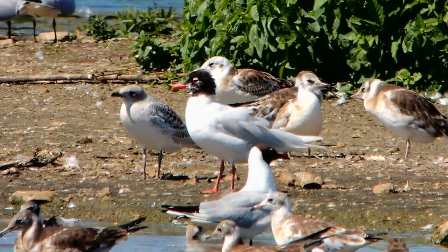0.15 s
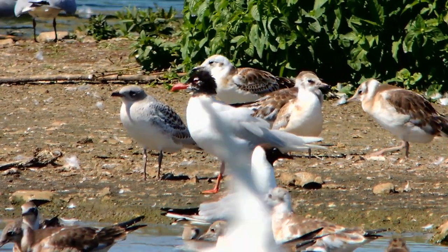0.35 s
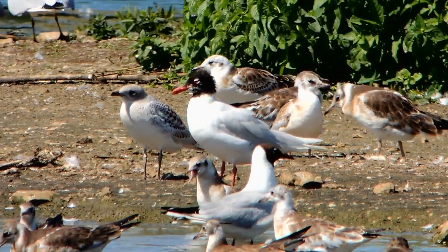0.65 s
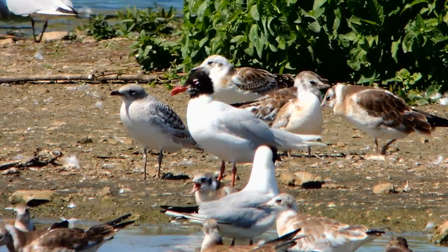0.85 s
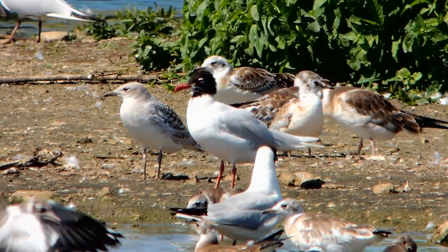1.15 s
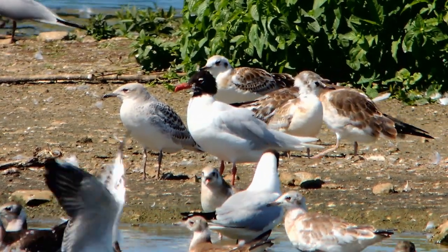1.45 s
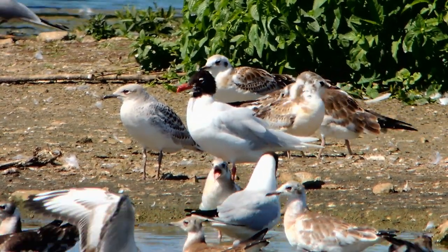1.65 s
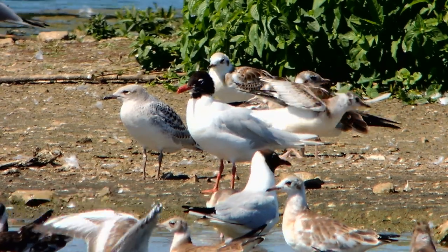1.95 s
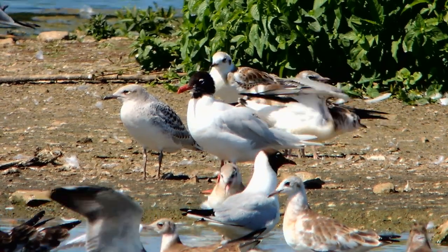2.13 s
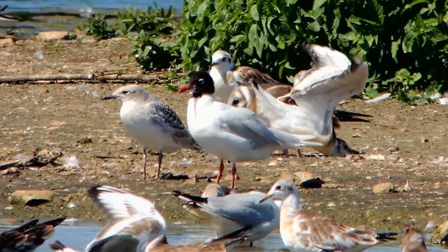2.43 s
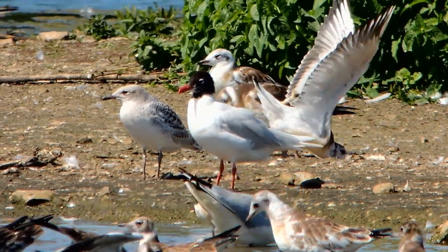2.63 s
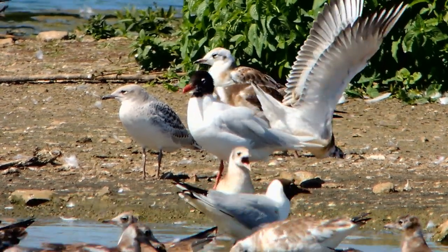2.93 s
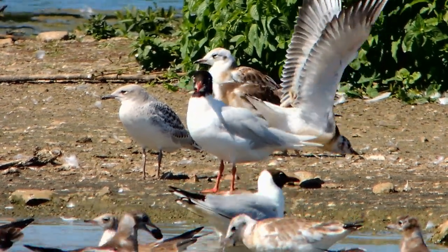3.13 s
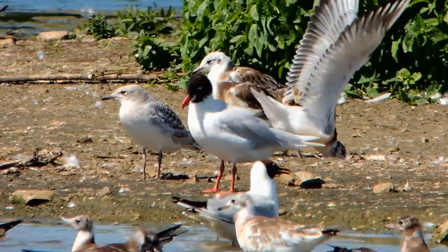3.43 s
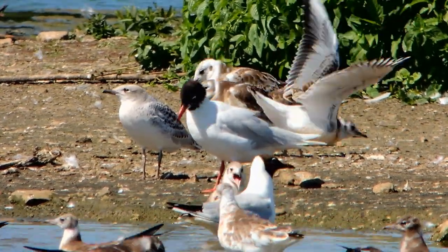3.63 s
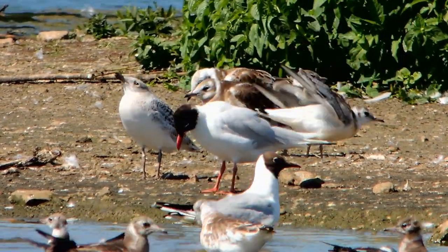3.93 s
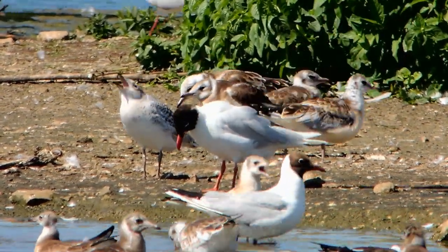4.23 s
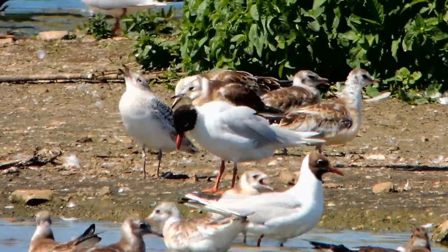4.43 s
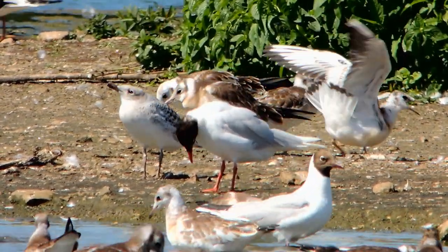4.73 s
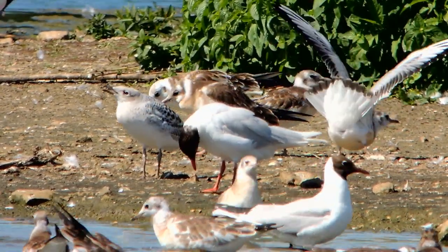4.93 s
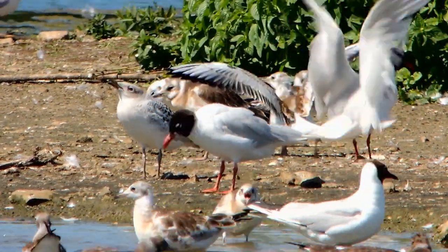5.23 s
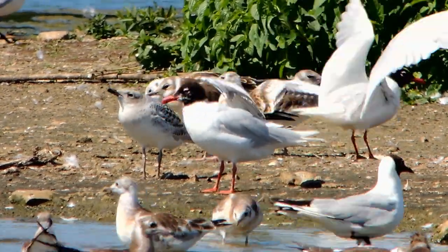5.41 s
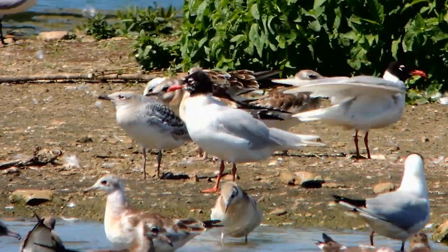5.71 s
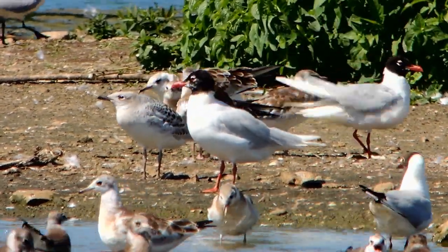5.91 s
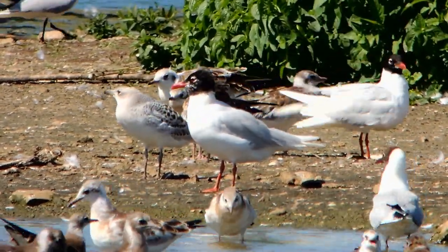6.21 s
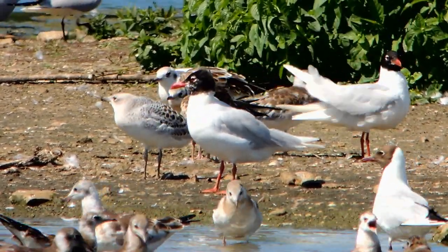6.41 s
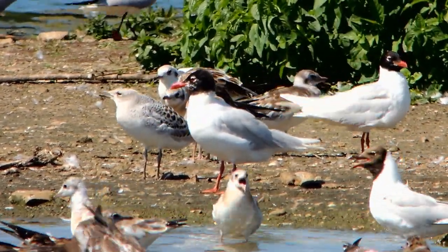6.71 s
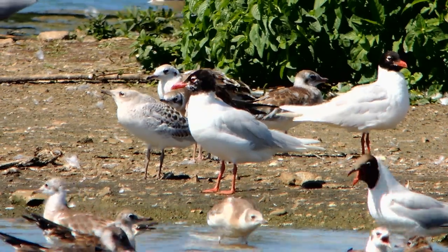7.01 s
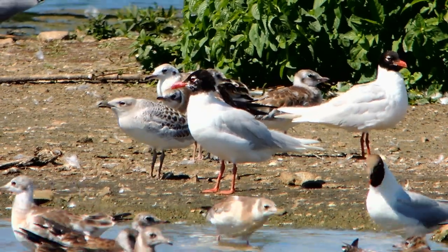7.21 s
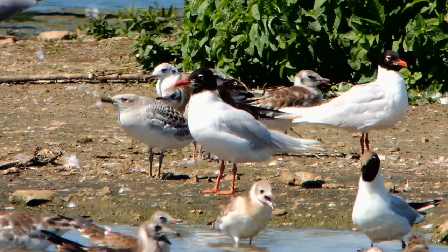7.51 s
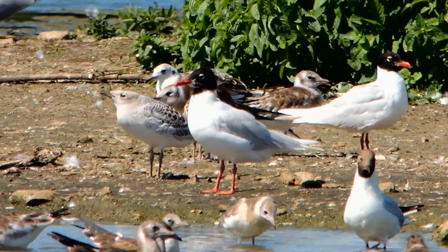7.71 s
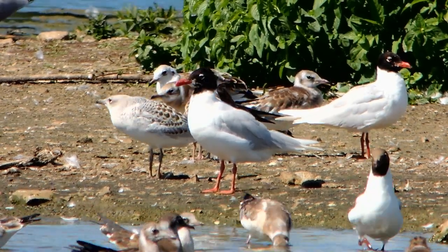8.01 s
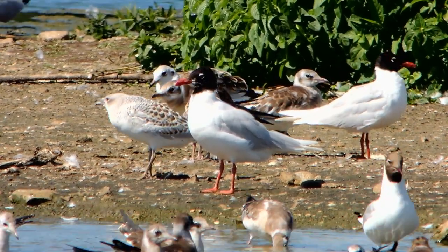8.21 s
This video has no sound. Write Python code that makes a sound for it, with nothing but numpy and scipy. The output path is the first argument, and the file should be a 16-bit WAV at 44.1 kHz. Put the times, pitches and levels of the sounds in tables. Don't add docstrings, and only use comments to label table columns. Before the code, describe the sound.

Outdoors at a gull colony by water, a far crowd of birds calls without pause over faint water noise and low road rumble. From 0 to 1 s several hoarse, distant adults give short rattling cries near 1 kHz, with thin chick whistles above. At 1.2-1.5 s the nearest chick lets out a piercing run of rapid squeaks, its voice cracking and scraping. Long adult cries overlap around 1.8-2.2 s. The chick strains again, more softly, at 2.4-2.6 s and 3.7-4.0 s. Between 2.9 and 4.8 s adults are nearer and rougher, with a bright rattling cry at 3.3 s and a buzzing one at 4.7 s. From 5 to 7 s chick whistles and squeals crowd together among clipped adult calls. A sharp cluster of camera-body ticks snaps at 7.0 s, with tiny ones after. A high cry follows at 7.3 s, then yelps and rasps until 8.4 s.

```python
import sys
import numpy as np
from scipy import signal
from scipy.fft import rfft, irfft, next_fast_len
from scipy.io import wavfile
from scipy.ndimage import uniform_filter1d, map_coordinates

SR = 44100
rng = np.random.default_rng(int(sys.argv[2]) if len(sys.argv) > 2 else 0)


def wav_out(sig):
    wavfile.write(sys.argv[1], SR, np.round(np.clip(np.atleast_2d(sig).T, -1, 1) * 32767).astype(np.int16))


def volts_from_decibels(level):
    exponent = np.asarray(level, float) / 20
    return 10 ** exponent


N = 368215

# (centre [Hz], width [Hz], gain [dB])
THROAT_HZ_DB = [(930, 550, -14.5), (1500, 820, -25), (1980, 480, 1.5)]
# (centre [Hz], width [Hz], gain [dB])
BEAK_HZ_DB = [(4300, 1070, 1), (5430, 920, -7), (6410, 290, -11.5)]
# (centre [Hz], width [Hz], gain [dB])
SHRILL_HZ_DB = [(7740, 2700, -2)]
# (centre [Hz], width [Hz], gain [dB])
GAPE_HZ_DB = [(2980, 1280, 1.5)]
# (multiple of loud harmonic [ratio], level above fourth-harmonic setting [dB])
OVERTONES = [(4 / 3, 0), (2, -11.5), (7 / 3, -18), (2.2, -22)]
# (time [s], far birds [dB], rumble [dB])
DISTANCE_DB = [(0.0, -45, -54), (0.04, -44, -47), (0.74, -39.5, -51.5), (1.84, -44, -54.5),
               (1.93, -40, -61), (2.04, -40.5, -50.5), (2.28, -45.5, -57), (3.25, -42.5, -55.5),
               (4.35, -45, -51), (4.65, -38, -47.5), (5.05, -46.5, -49.5), (5.7, -44.5, -50.5),
               (6.49, -48.5, -50), (7.49, -40, -49), (7.84, -47, -49), (8.35, -39.5, -50)]
# (frequency [Hz], density [dB])
BED_SPECTRUM = [(88, 1), (150, -3.5), (402, -7), (685, -3.5), (876, 1.5), (1330, -5), (1980, -0.5),
                (2490, -10.5), (3440, -13), (4320, -9), (6940, -27), (11800, -26.5), (14000, -31.5)]
# (frequency [Hz], density [dB])
BED_SIDE_SPECTRUM = [(88, -34), (150, -5), (1020, -5), (1840, -8), (2140, -11.5), (3310, -9.5),
                     (4320, -5.5), (14000, -15.5)]
# (frequency [Hz], density [dB])
RUMBLE_SPECTRUM = [(12, -32), (20, -1.5), (65, 2.5), (200, -23), (260, -61), (440, -120)]
# (time [s], snap level [dB], knock level [dB])
TICKS = [(6.9887, -14, -20), (6.990, -28, -37), (6.9915, -28, -50), (6.994, -18, -50), (6.997, -30, -50),
         (5.77, -41, -65), (6.225, -47, -60), (7.319, -33, -60), (7.19, -36, -70), (7.23, -37, -70),
         (7.85, -42, -70)]
# (centre [Hz], width [Hz], gain [dB])
SHELL_HZ_DB = [(7500, 4200, -8.5), (11200, 4500, -5)]
# (frequency [Hz], t60 [s])
SHORE_T60_S = [(500, 0.69), (2000, 0.18), (8000, 0.16)]
# (start [s], end [s], level [dB])
SCRAPES = [
    (1.37, 1.408, -65),
    (1.454, 1.498, -67),
    (2.543, 2.58, -59),
    (3.845, 3.89, -67),
    (3.91, 3.988, -64),
]
VOICES = {"far hoarse": (1030, .12, .14, 58, .46, -30, -9), "far husky": (1045, .06, .1, 66, .44, -24, -16),
          "far open": (970, .06, .06, 64, .55, -12, -3), "far low": (900, .04, .08, 61, .5, -28, -10),
          "far rising": (1180, .2, 0, 70, .55, -28, -8), "long caller": (1090, .07, .1, 57, .42, -12, -14),
          "buzzing": (1090, .1, .07, 120, .33, -2, -6), "high": (1290, .2, .24, 78, .36, -18, -24),
          "slow rattle": (1100, .16, .2, 49.5, .36, -24, -24),
          "wide rattle": (1325, .04, .04, 49.5, .22, -14, -8),
          "near rattle": (1150, .24, .1, 64.3, .42, -36, -4),
          "shrill rattle": (1330, .06, .03, 53.5, .24, -3, -17),
          "arching": (1090, .16, .12, 56, .42, -20, -14), "bright": (1125, .12, .13, 58, .36, -24, -10),
          "rasping": (1045, .05, .05, 80, .58, -11, -16), "thin rattle": (1010, .05, .05, 55, .24, -24, -4),
          "clear": (995, .05, .05, 58, .4, -20, -8), "yelping": (1195, .02, .25, 90, .33, -20, 0)}
FAR_CRIES = {"far hoarse": [(.385, 0.28, -41.5, -52.5, -2), (5.3, 0.13, -45.5, -53, 0)],
             "far husky": [(5.59, .24, -42, -53, -6), (6.86, 0.21, -47, -60, 8),
             (7.18, .28, -44.5, -53, 9)], "far open": [(5.88, 0.28, -45.5, -52.5, 0),
             (6.86, 0.21, -55, -48, 2)], "far low": [(0, .28, -43, -53, -9), (.46, 0.2, -48, -54, 0),
             (.685, .12, -42.5, -55, -1), (.9, .2, -45.5, -60, -2), (1.92, 0.33, -45.5, -62, 4),
             (5.56, .15, -50, -62, 0), (7.46, .26, -51, -61, -2), (8.25, 0.12, -48, -50.5, -4)],
             "far rising": [(.1, .19, -46, -52, 2), (7.75, .15, -47, -64, -11)]}
NEAR_CRIES = {"long caller": [(1.79, .3, -42.5, -61, -2), (1.91, .33, -43.5, -44.5, -2.5)],
              "buzzing": [(4.69, .19, -38, -52, -4)], "bright": [(2.61, .21, -39.5, -51, -1),
              (.77, .3, -43.5, -54, 5)], "high": [(7.26, .47, -60, -43.5, -4),
              (6.565, .26, -60, -49.5, -4)], "clear": [(6.2, 0.145, -44, -64, -5),
              (6.63, .14, -42.5, -52, -3), (5.43, .13, -43, -58, -5), (1.52, 0.177, -43, -57, -1)],
              "yelping": [(7.972, .14, -42, -47.5, -1)], "slow rattle": [(3.1, .25, -41, -43.5, -7)],
              "wide rattle": [(3.12, 0.19, -48.5, -44.5, -2), (3.795, .2, -45.5, -58, -4),
              (4.61, 0.242, -47, -51, -7), (5.37, .1, -54, -55, 0)],
              "near rattle": [(3.34, .215, -46.5, -37, 2)], "shrill rattle": [(4.446, 0.202, -62, -47, 2)],
              "arching": [(4.45, .24, -41.5, -51, -3), (1.58, .13, -52, -50.5, 4)],
              "rasping": [(3.66, .38, -41.5, -48.5, -3.5), (8.08, .2, -51, -47.5, 2)],
              "thin rattle": [(2.935, .175, -65, -45.5, -2), (8.245, .12, -65, -53, 0)]}
# (start [s], length [s], from [Hz], to [Hz], level [dB])
RISES = [(0.254, .125, 4393, 4400, -58.5), (1.172, .09, 3600, 3900, -58), (1.822, .03, 4080, 4900, -53),
         (1.78, .1, 6880, 7000, -70), (1.72, .115, 4450, 4680, -58), (6.49, 0.036, 3650, 4280, -55.5),
         (2.36, .05, 3200, 3920, -60), (2.42, .08, 5400, 6400, -65), (2.76, .19, 3100, 4050, -62),
         (1.785, .11, 3380, 3420, -61), (6.4, .1, 4100, 4400, -62), (3.604, 0.11, 4520, 4673, -61),
         (6.82, .06, 4500, 4600, -61), (6.885, .06, 4500, 4750, -58), (4.4, .09, 4600, 4650, -61),
         (4.79, .15, 3800, 4300, -58), (4.94, 0.027, 2570, 2649, -54), (5.13, .085, 4600, 4720, -55),
         (5.35, .05, 3600, 3760, -60), (5.462, 0.11, 3680, 4400, -56), (5.681, .07, 3950, 4350, -58),
         (5.777, 0.12, 4600, 4680, -53), (5.89, .05, 4640, 4680, -56), (6.23, 0.12, 3350, 3550, -63),
         (6.3, 0.099, 4200, 5060, -56.5), (6.514, 0.028, 3600, 3900, -52), (6.495, .022, 2950, 3100, -58),
         (6.5, .13, 4490, 4590, -56), (7.298, .06, 3650, 4270, -54), (7.505, .025, 3170, 3450, -53),
         (7.94, .16, 4480, 4640, -55)]
# (start [s], length [s], from [Hz], to [Hz], level [dB])
FALLS = [(1.04, 0.19, 4510, 4310, -58.5), (1.459, 0.029, 2990, 2730, -43.5), (1.85, .014, 4880, 4600, -53),
         (1.86, 0.16, 4580, 4450, -52), (2.3, .14, 4511, 4420, -61), (4.24, 0.027, 3047, 3036, -53.5),
         (5.215, 0.12, 5082, 4610, -58), (5.3, 0.094, 4770, 4690, -57.5), (5.6, .1, 4150, 3680, -63),
         (3.955, .03, 3800, 3450, -52), (5.82, 0.18, 4170, 3450, -62), (5.94, .1, 4960, 4500, -56.5),
         (6.24, .1, 2900, 2850, -61), (2.85, .09, 4400, 3800, -62), (2.28, .08, 4000, 3680, -62),
         (5.3, .11, 4700, 4380, -63), (7.72, .1, 3480, 3400, -61), (5.22, .1, 3250, 3050, -62),
         (6.44, 0.065, 4694, 4500, -57), (6.505, .065, 2400, 2200, -58), (6.565, 0.07, 3980, 3600, -53),
         (6.63, .08, 3620, 3500, -56), (6.72, .08, 3500, 3300, -62), (4.28, .03, 2550, 2500, -56),
         (4.22, .05, 4000, 3950, -60), (7.04, .06, 4400, 3950, -64), (6.65, .1, 4600, 4460, -60),
         (7.55, .03, 5000, 4800, -54)]
# (start [s], length [s], from [Hz], arch height [Hz], level [dB])
ARCHES = [(.271, 0.16, 4102, 200, -54), (2.495, .135, 4790, 160, -61), (6.1, .2, 4050, 200, -62),
          (5.64, .15, 3250, 120, -64), (1.04, .06, 3200, 200, -60), (2.62, 0.12, 4440, 94, -57),
          (2.762, 0.21, 4450, 114.5, -52), (5.08, .055, 4700, 185, -57), (5.748, .035, 4740, 140, -56),
          (6.33, 0.19, 3900, 319, -58), (6.862, 0.022, 3900, 250, -55), (8.3, .32, 3700, 260, -62),
          (5.56, .07, 4150, 149, -60), (7.41, .04, 3850, -120, -59), (7.69, .04, 3950, -150, -57),
          (6.525, .075, 7500, 800, -72)]
# (start [s], length [s], from [Hz], to [Hz], level [dB])
SQUEALS = [(.44, .3, 3950, 3750, -56), (.38, 0.22, 4800, 5050, -58), (.75, .3, 4400, 4600, -60),
           (1.94, 0.35, 4400, 4250, -53.5), (4.5, 0.196, 4300, 4750, -65), (6.385, 0.064, 5100, 4600, -57),
           (8.07, .2, 4720, 4150, -51.5), (8.11, 0.15, 4100, 4050, -58), (6.2, 0.13, 4600, 3800, -61),
           (7.12, 0.183, 4050, 4200, -57.5), (7.15, 0.127, 4450, 4600, -59.5),
           (7.99, 0.14, 4300, 4750, -59), (5.6, .16, 4750, 4700, -57.5), (5.36, .09, 4100, 4100, -59),
           (2.43, .11, 3500, 3350, -64), (2.54, .13, 3050, 2900, -59), (6.74, .13, 3200, 3650, -59.5),
           (2.68, .15, 4900, 5000, -62), (7.52, .21, 4800, 3950, -59), (7.32, 0.2, 4650, 4850, -56),
           (3.97, .12, 4000, 4250, -57), (3.55, 0.122, 4300, 4450, -59), (6.9, 0.16, 4100, 4700, -61),
           (5.23, .07, 3600, 3520, -55), (2.93, 0.171, 3050, 3200, -58.5), (5.95, .2, 5300, 4100, -65)]
# (start [s], length [s], third harmonic from [Hz], to [Hz], level [dB])
STRAINED = [
    (1.204, 0.056, 4250, 4220, -40),
    (2.463, .048, 4220, 4260, -48),
    (1.443, .021, 4330, 3860, -39),
]
# (start [s], length [s], third harmonic from [Hz], to [Hz], level [dB])
BROKEN = [
    (1.378, 0.0153, 4200, 3900, -37),
    (1.393, 0.0095, 3860, 4100, -36),
    (1.463, .005, 4100, 3950, -41),
    (1.468, 0.0091, 4000, 4200, -39),
    (1.475, 0.018, 3880, 3790, -44.5),
    (2.534, 0.0175, 4240, 3820, -46),
    (2.553, .03, 4150, 4270, -49),
    (3.85, 0.027, 4020, 3880, -42),
    (3.908, 0.053, 4010, 3690, -42),
]
# (start [s], length [s], third harmonic from [Hz], to [Hz], level [dB])
CLEAR = [
    (1.259, 0.028, 4320, 4500, -42.5),
    (1.283, 0.03, 4460, 3820, -31),
    (1.313, 0.032, 4120, 4200, -36.5),
    (1.348, 0.034, 4380, 3930, -39),
    (1.415, 0.03, 4150, 4290, -43.5),
    (2.424, 0.045, 4200, 4440, -52),
    (2.59, .038, 4000, 3860, -47.5),
    (3.714, 0.046, 4230, 4350, -47),
    (3.82, 0.031, 4300, 4130, -45),
]
# (start [s], length [s], third harmonic from [Hz], to [Hz], level [dB])
SCOOPED = [
    (3.666, 0.05, 4210, 4180, -46.5),
    (3.763, 0.048, 4250, 4280, -42.5),
]
# (slur ease [exponent], bow [Hz], pitch waver [share],
# level waver [dB], fourth harmonic [dB])
NOTE_KINDS = [(0.98, -150, 0.009, 1, -12), (0.75, -1, 0.0197, 3.5, -11.5), (0.576, 60, 0.011, 0, -22),
              (1, -190, .008, 1.5, -16)]

BED_DB, SIDE_DB = -46, -59.5
BAND_LIMIT_HZ = 14200
CRY_DROOP_DB, WHISTLE_DROOP_DB = 1.5, 1
RISE_EASE, FALL_EASE, ARCH_SAG_HZ = 1.4, 1.4, 102.6
PUSH_DB_PER_KHZ = 19
SQUEAL_WAVER, THROAT_FOLLOWS = 0.038, 0.85
BURST_LEAN, BURST_ARCH = 1.35, 0.035


def unit(x):
    return x / np.sqrt(np.mean(x ** 2) + 1e-20)


def along(points, hz):
    f, v = np.transpose(points)
    return np.interp(np.log(hz + 1), np.log(f + 1), v)


def humps(modes, hz):
    return sum(volts_from_decibels(db) / (1 + ((hz * hz - c * c) / (hz * w + 1)) ** 2) for c, w, db in modes)


def wobble(rate, n):
    return map_coordinates(rng.standard_normal(int(n * rate / SR) + 4), [np.arange(n) * rate / SR])


def span(rows, fade):
    s, *cols = np.transpose(rows)
    t = np.arange(s[0], s[-1], 1 / SR)
    edge = np.clip(np.minimum(t - s[0], s[-1] - t) / fade, 0, 1)
    return round(s[0] * SR), np.sin(edge * np.pi / 2) ** 2, [np.interp(t, s, c) for c in cols]


def slur(s, length, from_hz, to_hz, ease, bow_hz, fade):
    start, edge, (u,) = span([(s, 0), (s + length, 1)], fade)
    glide_hz = (to_hz - from_hz) * (1 - (1 - u) ** ease)
    return start, edge, u, from_hz + glide_hz + bow_hz * np.sin(np.pi * u)


def add(track, start, sound):
    track[start:start + len(sound)] += sound[:N - start]


def filtered(x, response):
    m = next_fast_len(N + 8192)
    return irfft(rfft(x, m) * response(np.fft.rfftfreq(m, 1 / SR)), m)[..., :N]


def noise(spectrum):
    return unit(filtered(rng.standard_normal(N), lambda hz: volts_from_decibels(along(spectrum, hz))))


def background():
    s, _, rumble_db = np.transpose(DISTANCE_DB)
    rumble = volts_from_decibels(np.interp(np.arange(N) / SR, s, rumble_db))
    mid = volts_from_decibels(BED_DB) * noise(BED_SPECTRUM) + rumble * noise(RUMBLE_SPECTRUM)
    side = volts_from_decibels(SIDE_DB + 0.0) * noise(BED_SIDE_SPECTRUM) + rumble * noise(RUMBLE_SPECTRUM) / 2.8
    return np.array([mid + side, mid - side])


def shore(x):
    hz, t, z = signal.stft(rng.standard_normal((2, SR // 2)), SR, nperseg=256)
    decay = volts_from_decibels(-60 * t / along(SHORE_T60_S, hz)[:, None])
    tail = signal.istft(z * decay, SR, nperseg=256)[1]
    tail = tail[0] + 0.33 * tail[1] * np.array([[1], [-1]])
    return signal.fftconvolve(x[None], tail / np.linalg.norm(tail[0]), axes=1)[:, :N]


def ticks():
    snap, knock, t = np.zeros((2, N)), np.zeros(N), np.arange(SR // 20) / SR
    for s, snap_db, knock_db in TICKS:
        shared, own = rng.standard_normal((2, len(t)))
        decay = volts_from_decibels(snap_db - 1.5 - 60 * t / 0.012) + volts_from_decibels(snap_db - 14.0 - 60 * t / 0.12)
        snap[:, round(s * SR):][:, :len(t)] += decay * [shared, 1.08 * own - 0.3 * shared]
        add(knock, round(s * SR), volts_from_decibels(knock_db - 60 * t / 0.0059) * np.sin(2 * np.pi * 1700 * t))
    return knock + filtered(snap, lambda hz: humps(SHELL_HZ_DB, hz))


def crowd(count=100):
    out = np.zeros(N)
    for i, (when, long, pitch, size, kind) in enumerate(rng.random((count, 5))):
        s, db = (i + when) / count * N / SR, 6 * size
        shape = [(s, .94, db - 16), (s + .08, 1.02, db), (s + .18 + .25 * long, .93, db + 1.0)]
        start, edge, (glide, level_db) = span(shape, fade=0.081)
        voice = (830 + 330 * pitch, .1, .1, 50 + 40 * kind, .5, -14.5, -1.7)
        add(out, start, edge * squawk(*voice, level_db, level_db - 10.5))
        chick_hz = (3200 + 1300 * kind) * glide ** 2
        add(out, max(start - 9000, 0), edge * whistle(chick_hz, level_db - 24))
    return unit(out)


def whistle(hz, db, hoarse=0):
    n = len(hz)
    phase = 2 * np.pi * np.cumsum(hz * (1 + 0.0023 * wobble(102.0, n) + hoarse * wobble(700, n))) / SR
    return volts_from_decibels(db + 6.5 + 1.7 * wobble(62.4, n)) * (np.sin(phase) + volts_from_decibels(-30.5) * np.sin(2 * phase))


def chicks():
    out = np.zeros(N)
    notes = [(*note, RISE_EASE, 0) for note in RISES] + [(*note, FALL_EASE, 0) for note in FALLS]
    notes += [(s, length, hz, hz - ARCH_SAG_HZ, db, 1, bow_hz) for s, length, hz, bow_hz, db in ARCHES]
    for s, length, from_hz, to_hz, db, ease, bow_hz in notes:
        start, edge, u, hz = slur(s, length, from_hz, to_hz, ease, bow_hz, fade=0.006)
        add(out, start, edge * whistle(hz, db - WHISTLE_DROOP_DB * (2 * u - 1) ** 2))
    for s, length, from_hz, to_hz, db in SQUEALS:
        start, edge, _, hz = slur(s, length, from_hz, to_hz, 0.99, 60.8, fade=0.027)
        add(out, start, edge * whistle(hz, db + 3 * wobble(69.6, len(hz)), SQUEAL_WAVER))
    return out


def near_chick():
    voice, scrape = np.zeros(N), np.zeros(N)
    groups = zip([STRAINED, BROKEN, CLEAR, SCOOPED], NOTE_KINDS)
    for notes, (ease, bow_hz, waver, waver_db, fourth_db) in groups:
        jitter_rad = 60 * waver ** 2 / 0.0074
        for *note, db in notes:
            start, edge, _, hz = slur(*note, ease, bow_hz, fade=0.003)
            n = len(hz)
            level_db = db - PUSH_DB_PER_KHZ * (hz - hz.min()) / 1000
            phase = 2 * np.pi * np.cumsum(hz * (1 + waver * wobble(174, n))) / SR
            tone = np.sin(phase)
            for multiple, gain_db in OVERTONES:
                overtone = np.sin(multiple * phase + jitter_rad * wobble(498, n))
                tone = tone + volts_from_decibels(fourth_db + gain_db) * overtone
            add(voice, start, edge * volts_from_decibels(level_db + 5.0 + waver_db * wobble(146, n)) * tone)
    for s, end, db in SCRAPES:
        start, edge, _ = span([(s,), (end,)], fade=0.0039)
        n = len(edge)
        add(scrape, start, edge * volts_from_decibels(db + 3.3 * wobble(200, n)) * rng.standard_normal(n))
    mouth = [(4660, 2400, 18), (7500, 3100, 1.8), (10600, 3100, 3.4)]  # Hz, width Hz, dB
    return voice + filtered(scrape, lambda hz: humps(mouth, hz))


def squawk(top_hz, climb, sag, rattle, rough, shrill_db, gape_db, throat_db, beak_db):
    n = len(throat_db)
    u = np.linspace(0, 1, n)
    base_hz = top_hz * (1 - climb * np.exp(-u / .2) - sag * u ** 2 + .035 * rough * wobble(16, n))
    turn = np.cumsum(rattle * (1 + 0.025 * wobble(31.4, n))) / SR
    turn = (turn % 1) ** BURST_LEAN
    gate = 1 - np.clip(1.15 - 1.23 * rough, 0, 1) * np.cos(np.pi * turn) ** 6
    bend = -BURST_ARCH * (.4 + np.cos(2 * np.pi * turn)) * min(1, 60 / rattle)
    jitter = (.004 + .11 * rough ** 2) * wobble(600, n)
    phase = 2 * np.pi * np.cumsum(base_hz * (1 + bend + jitter)) / SR
    k = np.arange(1, 12)[:, None]
    hz = k * base_hz
    beak_gain = humps(BEAK_HZ_DB, hz) + volts_from_decibels(gape_db) * humps(GAPE_HZ_DB, hz)
    beak_gain = beak_gain + volts_from_decibels(shrill_db - 16 * (u - .4) ** 2) * humps(SHRILL_HZ_DB, hz)
    throat_gain = humps(THROAT_HZ_DB, hz * (1000 / top_hz) ** THROAT_FOLLOWS)
    stack = volts_from_decibels(rng.normal(0, 1.75, k.shape)) * np.sin(k * phase + 0.289 * k * k)
    limp = np.abs(.85 + .35 * wobble(90, n)) * np.cos(phase / 2 + 1.8 * rough * wobble(300, n))
    rasp = (1 + .6 * rough * wobble(1500, n)) / np.hypot(1, .6 * rough)
    low = volts_from_decibels(throat_db - 3.5) * (1 + 0.5 * limp) * np.sum(stack * throat_gain, axis=0)
    beak_level = volts_from_decibels(beak_db - 3.5 - 6.5 * (2 * u - 1) ** 4)
    high = beak_level * (1 + 1.14 * limp) * np.sum(stack * beak_gain, axis=0)
    return gate * rasp * (low + high)


def adults():
    out, far = np.zeros(N), np.zeros(N)
    cries = {**FAR_CRIES, **NEAR_CRIES}
    for bird, voice in VOICES.items():
        roughness = voice[4]
        for s, length, throat_db, beak_db, swell_db in cries[bird]:
            start, edge, (u,) = span([(s, -1), (s + length, 1)], fade=0.011)
            effort_db = swell_db * u / 2 - CRY_DROOP_DB * u ** 2
            sound = edge * squawk(*voice, throat_db + effort_db + 1.26, beak_db + effort_db)
            add(out, start, sound)
            add(far, start, roughness * sound)
    return out, far


def scene():
    s, far_db, _ = np.transpose(DISTANCE_DB)
    far = volts_from_decibels(np.interp(np.arange(N) / SR, s, far_db) - 4.5) * crowd()
    (old, old_far), young, near = adults(), chicks(), near_chick()
    direct = old + young + volts_from_decibels(-3.0) * far + near * volts_from_decibels([[-.7], [.7]])
    scatter = shore(volts_from_decibels(-3.0) * old_far + volts_from_decibels(-8.5) * young + volts_from_decibels(-6.0) * near + volts_from_decibels(-6.5) * far)
    return direct + scatter + ticks() + background()


def drop_masked(x):
    hz, _, z = signal.stft([x[0] + x[1], x[0] - x[1]], SR, nperseg=1024)
    hz = hz[:, None]
    power = uniform_filter1d(np.abs(z) ** 2, size=7, axis=1)
    slow = uniform_filter1d(power, size=3, axis=2)
    masked = (slow[1] < volts_from_decibels(-37) * slow[0]) & (hz > 1400)
    floor = np.clip((hz - 10000) / 5500, 0, .8) * (hz < BAND_LIMIT_HZ)
    faint = power < np.median(power, axis=2, keepdims=True) * floor
    kept = z * [masked * 0 + 1, ~masked] * ~faint
    mid, side = signal.istft(kept, SR, nperseg=1024)[1][:, :N] / 2
    return np.array([mid + side, mid - side])


def roll_off(x):
    return signal.sosfilt(signal.butter(12, 16380, fs=SR, output="sos"), x)


def record(dry):
    balanced = drop_masked(dry) * volts_from_decibels([[-.15], [.15]])
    mix = filtered(balanced, lambda hz: np.where(hz < BAND_LIMIT_HZ, 1, volts_from_decibels(-22)))
    return roll_off(mix)


dry = scene()
out = record(dry)
wav_out(out)
```